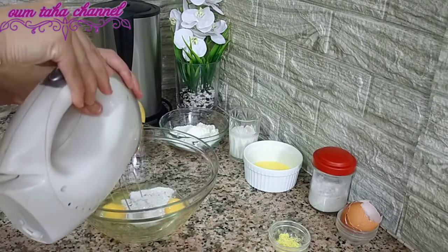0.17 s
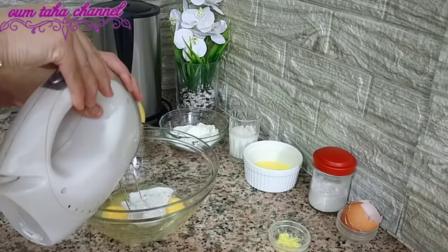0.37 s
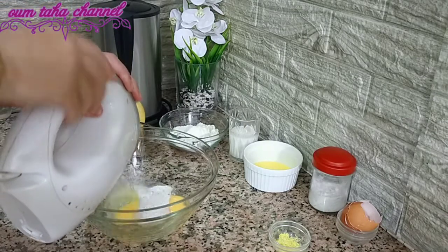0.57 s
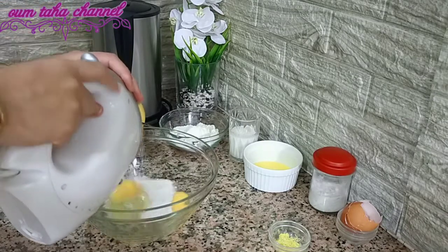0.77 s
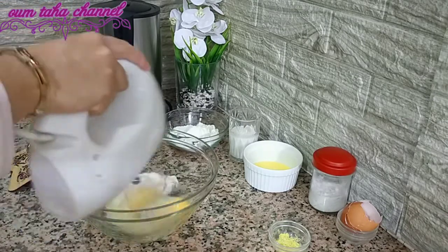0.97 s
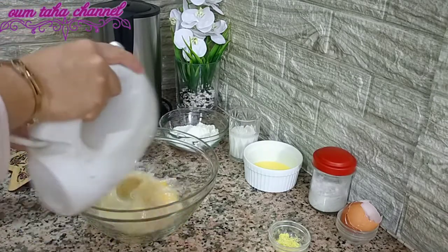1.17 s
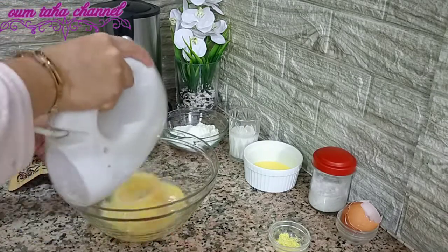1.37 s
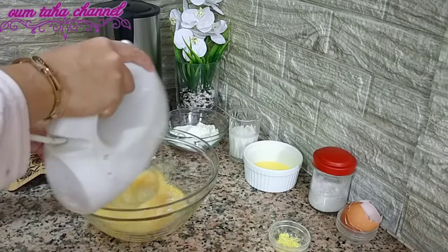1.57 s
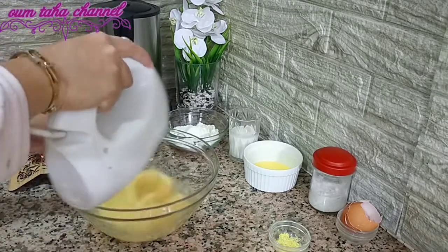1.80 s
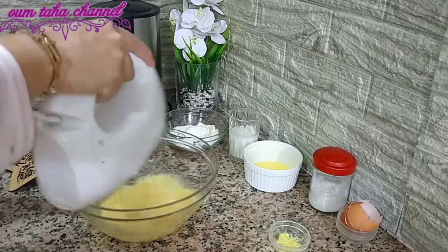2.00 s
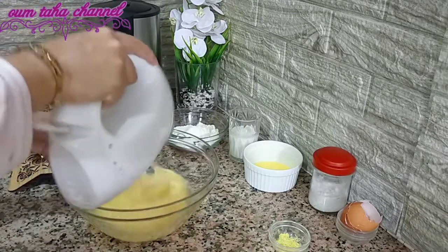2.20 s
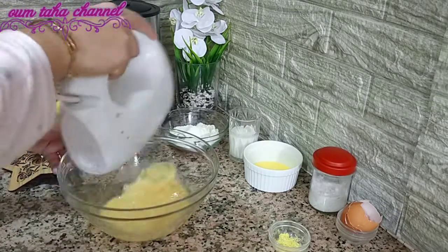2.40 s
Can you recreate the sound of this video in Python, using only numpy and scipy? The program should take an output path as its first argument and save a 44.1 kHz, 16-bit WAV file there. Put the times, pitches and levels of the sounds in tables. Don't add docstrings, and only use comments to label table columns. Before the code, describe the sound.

Hand mixer motor starting with sharp switch snaps, then steady whirring and beaters rattling on a glass bowl

```python
import sys
import numpy as np
from scipy import signal
from scipy.fft import rfft, irfft
from scipy.io import wavfile
from scipy.ndimage import uniform_filter1d

SR = 44100
rng = np.random.default_rng(int(sys.argv[2]) if len(sys.argv) > 2 else 0)


def invert_db(level):
    return 10 ** (np.asarray(level, dtype=float) / 20)


def persist_wave(psi):
    counts = np.round(np.clip(psi, -1, 1) * 32767).astype(np.int16)
    wavfile.write(sys.argv[1], SR, np.atleast_2d(counts).T)


N = 108045
CHANGE_S = 0.8765


def evened(x):
    return x / np.sqrt(np.mean(x ** 2) + 1e-20)


def read(points, hz):
    f, value = np.transpose(points)
    return np.interp(np.log(hz + 1), np.log(f + 1), value)


def follow(points, t):
    return np.interp(t, *np.transpose(points))


def add(mix, start_s, sound):
    part = mix[round(start_s * SR):][:len(sound)]
    part += sound[:len(part)]


def slow(hz):
    size = int(SR / hz)
    return evened(uniform_filter1d(uniform_filter1d(rng.standard_normal(N), size), size))


def resonate(x, hz, width_hz):
    turn = np.exp(2j * np.pi * hz * np.arange(len(x)) / SR)
    r = np.exp(-np.pi * width_hz / SR)
    return 2 * (turn * signal.lfilter([1 - r], [1, -r], x / turn + 1e-18)).real


def shaped(x, field):
    hz, t, z = signal.stft(x, SR, nperseg=512, noverlap=384)
    z = z * invert_db(field(hz[:, None], t[None]))
    return signal.istft(z, SR, nperseg=512, noverlap=384)[1][:len(x)]


# pitch_hz, level_db (per Hz)
ROOM_COLOUR = [(25, -5), (50, -10), (100, -2.5), (140, -11), (420, -23.5), (2900, -27), (4500, -42),
               (16000, -48)]
# pitch_hz, level_db (rms)
HUM = [(49.9, -67.5), (100.3, -60), (156.1, -73), (376.8, -72)]


def room_tone():
    t = np.arange(N) / SR
    hz = np.fft.rfftfreq(N, 1 / SR)
    noise = irfft(rfft(rng.standard_normal(N)) * invert_db(read(ROOM_COLOUR, hz)), N)
    tone = invert_db(-56 - 2.5) * evened(noise)
    for pitch_hz, level_db in HUM:
        level = np.sqrt(2) * invert_db(level_db + 2.0 * slow(1.6))
        tone += level * np.sin(2 * np.pi * (pitch_hz * t + rng.random()))
    return tone * np.where(t < CHANGE_S, 1, invert_db(-16.5))


# start_s, level_db (peak), treble_share (0 to 1), room_db
SNAPS = [
    (.1930, -56, 0.37, 17),
    (0.2001, -12, 0.64, -12.5),
    (.2055, -24, 0.27, -46),
    (.3509, -23, 0.77, -8),
    (.3803, -16, 0.27, -34),
    (.3812, -20, 0.2, -30),
    (.2013, -19, 0.2, -28),
    (.4985, -30, 0.36, -30),
]
# pitch_hz, level_db, fade_s (to -60 dB; anything above 0.022 s is played as
# 0.022 s)
SNAP_LOW = [(1210, -4.5, 0.028), (1830, 2.5, 0.052), (2260, -3.5, 0.013), (3080, -3, 0.025),
            (3357, -2, 0.03), (4160, -35, 0.13)]
# pitch_hz, level_db, fade_s (to -60 dB; anything above 0.022 s is played as
# 0.022 s)
SNAP_HIGH = [(6580, -16, 0.027), (8040, 2, 0.023), (11300, -27, 0.0042), (13130, -6, 0.011),
             (14500, 2, 0.014), (14100, -8, 0.02), (15300, -1, 0.013)]
# pitch_hz, fade_s (to -60 dB)
KITCHEN_FADE = [(300, 0.62), (790, 0.54), (2090, 0.85), (5510, 0.55), (14600, 0.63)]
# pitch_hz, level_db (per Hz)
KITCHEN_COLOUR = [(300, -12.5), (470, -19), (600, 0), (750, 5), (1050, -6), (1900, -4), (4500, -13),
                  (8000, -4), (11000, -16.5), (15000, -6)]


def plastic(rings, t):
    out = np.zeros(len(t))
    for pitch_hz, level_db, fade_s in rings:
        fade = invert_db(level_db - 60 * t / min(fade_s, .022))
        out += fade * np.sin(2 * np.pi * (pitch_hz * t + rng.random()))
    return out / abs(out).max()


def kitchen(hz, s):
    return read(KITCHEN_COLOUR, hz) - 60 * s / np.clip(read(KITCHEN_FADE, hz), .1, .9)


def switch():
    t, out = np.arange(SR // 2) / SR, np.zeros(N)
    for start_s, level_db, treble, room_db in SNAPS:
        low, high = plastic(SNAP_LOW, t), plastic(SNAP_HIGH, t)
        crack = invert_db(3) * np.exp(-t / .003) * np.diff(rng.standard_normal(len(t) + 1))
        snap = (1 - treble) * low + treble * (high + crack / 2)
        echo = shaped(rng.standard_normal(len(t)), kitchen)
        echo *= np.minimum(t / 0.0018, 1) / echo[:2000].std()
        snap *= np.minimum(t / 0.00049, 1)
        add(out, start_s, invert_db(level_db) * (snap + invert_db(room_db - 9.0) * echo))
    return out * (np.arange(N) < CHANGE_S * SR)


# time_s, level_db
WINDUP_LEVEL = [(.38, -35.5), (.42, -37), (.5, -36), (.57, -35.5), (.74, -34.5), (0.868, -33.5)]
# time_s, level_db
RUNNING_LEVEL = [(.88, -53.5), (.91, -50), (1.3, -49), (1.41, -52), (1.47, -56), (1.495, -56),
                 (1.505, -47.5), (1.53, -50), (1.9, -49.5), (2.28, -50), (2.37, -49), (2.376, -57.5),
                 (2.402, -54.5), (2.408, -52.5), (2.44, -49)]
# time_s, speed_hz (turns per second)
WINDUP_SPEED = [(.375, 80), (.395, 88), (.42, 122), (.45, 159), (.49, 191), (.52, 214), (.55, 220),
                (.6, 247), (.66, 268), (.87, 313)]
# time_s, speed_hz (turns per second)
RUNNING_SPEED = [(.88, 341), (.95, 356), (1.04, 368), (1.2, 362), (1.5, 362), (1.7, 360), (2.1, 359),
                 (2.28, 357), (2.44, 364)]
ORDER = [1, 2, 3, 4, 5, 6, 9, 12, 23, 24, 25, 36, 48]
# level_db (full speed), slope_db (per octave of speed), ceiling_db, waver_db
SHAFT = [(16.5, 51, -8.5, 2.5), (-21.5, 4, -17, 6.5), (-12.5, 36, -11, 2.5), (-18.5, 12, -14, 2),
         (-20, 7, -16, 2), (-13, 19, -17, 2.5), (-21, 3, -15, 6), (0, 0, 10, 1), (-19, 37, -19, 7),
         (-9, 38, -12, 6), (-25, 20, -20, 7), (-24, 70, -15, 6), (-44, 20, -25, 6)]
# time_s, level_db
SLOT_WHINE = [(.372, -25), (.388, -3), (.41, -5), (.42, 0), (.46, 0), (.485, -4), (.53, 1), (.553, 0),
              (.563, -12), (.65, -12), (.7, -24), (.87, -40)]
# time_s, level_db
TILT = [(.88, 2), (1.12, -2), (1.2, -2), (1.5, -4), (1.7, 0), (2.0, 2.5), (2.25, 5), (2.36, 0),
        (2.44, -8.5)]
# pitch_hz, level_db (per Hz)
AIR_WINDUP = [(120, -20), (250, -16), (500, -7.5), (1000, -5), (3200, -7.5), (4900, -20), (11000, -23),
              (16000, -14)]
# pitch_hz, level_db (per Hz)
AIR_RUNNING = [(120, -13.5), (300, -11.5), (500, -5.5), (1100, -5.5), (3600, -9), (5200, -20), (11000, -22),
               (16000, -15)]
# pitch_hz, width_hz, level_db
CASING = [(1060, 175, 7), (1389.5, 38, 8), (1810, 96, 3.5), (2127, 244, 5), (849, 160, -15), (560, 66, 4),
          (404, 34, -3), (2700, 560, 2), (8200, 2060, 9.5), (14300, 4100, 3)]


def shaft_tones(t, turns, octave, beat):
    tones, tilt_db = np.zeros(N), follow(TILT, t)
    for k, (level_db, slope_db, ceiling_db, waver_db) in zip(ORDER, SHAFT):
        lift_db = level_db + slope_db * octave
        if k > 30:
            lift_db = lift_db + 30 * (t < CHANGE_S)
        lift_db = np.minimum(lift_db, ceiling_db) + ((k == 1) + (k == 24) / 2) * tilt_db
        throb = 1
        if k == 12:
            lift_db = lift_db + follow(SLOT_WHINE, t)
            throb = (1 + 0.97 * beat) * (1 + .4 * slow(350))
        level = np.sqrt(2) * throb * invert_db(lift_db + waver_db * np.tanh(slow(47)))
        phase = k * turns + rng.random()
        phase += .09 * np.sqrt(k / 24) * slow(200)
        tones += level * np.sin(2 * np.pi * phase)
    return tones


def fan_air(t, turns, octave, beat):
    clicks = invert_db(10 * np.minimum(rng.exponential(1, N), 1.6))
    clicks *= rng.random(N) < 500 / SR
    clicks *= rng.choice([-1, 1], N)
    air = rng.standard_normal(N) * (1 + 0.075 * beat) * (1 + 0.067 * np.cos(2 * np.pi * turns))
    drive = air + invert_db(-9.5) * evened(clicks)

    def through_casing(spectrum):
        def colour(hz, s):
            patches = rng.standard_normal((hz.size, s.size))
            patches = uniform_filter1d(uniform_filter1d(patches, size=6, axis=0), size=16, axis=1)
            casing_db = sum(db / (1 + (2 * (hz - f) / w) ** 2) for f, w, db in CASING)
            treble_db = np.clip(np.log2(hz / 3000 + .01), 0, 1) * 3 * np.interp(s, t, octave)
            return read(spectrum, hz) - 40 * (hz < 110) + casing_db + treble_db + 2 * evened(patches)
        return shaped(drive, colour)

    before = t < CHANGE_S
    early, late = through_casing(AIR_WINDUP), through_casing(AIR_RUNNING)
    return np.where(before, early / early[before].std(), late / late[~before].std())


def motor():
    t = np.arange(N) / SR
    before = t < CHANGE_S
    speed_hz = np.where(before, follow(WINDUP_SPEED, t), follow(RUNNING_SPEED, t))
    level_db = np.where(before, follow(WINDUP_LEVEL, t), follow(RUNNING_LEVEL, t))
    turns = np.cumsum(speed_hz) / SR
    octave = np.log2(speed_hz / 360)
    beat = np.cos(2 * np.pi * 103 * (t - .4195 - 0.00062 * slow(16)))
    start = np.clip((t - 0.361) / 0.01, 0, 1) ** 2
    sound = shaft_tones(t, turns, octave, beat) + fan_air(t, turns, octave, beat)
    return start * invert_db(level_db) * sound


# pitch_hz, width_hz, level_db
GLASS = [(6600, 90, -7), (7030, 60, 0), (8600, 120, -5), (9400, 60, -9), (10050, 60, -3), (10930, 60, -2),
         (11100, 60, -4), (12300, 70, -5), (13100, 70, -10), (14050, 60, -4), (14700, 90, -6),
         (15150, 100, -7), (15600, 100, -11)]
# start_s, level_db, contact_s, low_rings_db
CHATTER = [(.482, -48, .014, -6), (.752, -48, .014, -6), (.8996, -54, .01, -6), (1.337, -49, .014, 4),
           (1.354, -52, .006, -8), (1.380, -45, .018, 0), (1.403, -46, .014, 0), (1.418, -47, .007, 2),
           (1.425, -45, .02, 2), (1.445, -50, .02, 0), (1.4765, -42, .013, 1), (1.490, -50, .009, -6),
           (1.5065, -42, .013, -10), (1.765, -55, .006, -6), (2.309, -42.5, .013, 1), (2.322, -49, .024, 4),
           (2.345, -48, .015, -4), (2.361, -42, .012, 7), (2.376, -48, .018, 2), (2.4015, -43, .013, 3),
           (2.413, -51, .012, 2)]


def bowl():
    out, t = np.zeros(N), np.arange(0, .06, 1 / SR)
    bright = signal.butter(8, 6300, "high", fs=SR, output="sos")
    spreads_db = 2.5 * rng.standard_normal((len(CHATTER), len(GLASS)))
    for (start_s, level_db, contact_s, low_db), spread_db in zip(CHATTER, spreads_db):
        push = np.sin(np.pi * np.clip(t / contact_s, 0, 1) ** 0.45) ** 0.37
        ticks = push * rng.standard_normal(len(t)) * (rng.random(len(t)) < .4)
        ring = np.zeros(len(t))
        for (pitch_hz, width_hz, ring_db), extra_db in zip(GLASS, spread_db):
            level = invert_db(ring_db + extra_db + low_db * (pitch_hz < 8000)) / np.sqrt(width_hz)
            ring += level * resonate(ticks, pitch_hz, width_hz)
        head = round(contact_s * SR)
        burst = ring / ring[:head].std() + invert_db(-18) * ticks / ticks[:head].std()
        damping = np.exp(-np.maximum(t - contact_s, 0) / .004)
        add(out, start_s, invert_db(level_db) * signal.sosfilt(bright, burst) * damping)
    return out


# start_s, level_db, pitch_hz, fade_s (to -60 dB)
PINGS = [(.2, -15, 14700, .02), (.2003, -19, 13700, .02), (.381, -26, 1310, .08), (.752, -33, 9050, .08),
         (.752, -36, 9450, .07), (.752, -38, 6050, .07), (.77, -38, 8300, .06), (.562, -36, 8450, .06),
         (.483, -41, 10900, .2), (1.66, -56, 11100, .08), (2.015, -54, 11100, .07), (2.06, -54, 11100, .08),
         (2.018, -57, 11800, .05), (2.068, -57, 11800, .05), (1.57, -56, 13100, .1)]
# start_s, level_db, pitch_hz, fade_s (to -60 dB)
BUMP = (2.345, -60, 200, .12)


def pings_and_bump():
    out = np.zeros(N)

    def strike(event, length_s, rise_s):
        start_s, level_db, pitch_hz, fade_s = event
        t = np.arange(0, length_s, 1 / SR)
        fade = invert_db(level_db - 60 * t / fade_s) * np.minimum(t / rise_s, 1)
        add(out, start_s, fade * np.sin(2 * np.pi * pitch_hz * t))

    for ping in PINGS:
        strike(ping, .06, .001)
    strike(BUMP, .15, .0049)
    return out


def scene():
    return np.tile(motor() + switch() + bowl() + pings_and_bump() + room_tone(), (2, 1))


def roll_off(x):
    return signal.sosfilt(signal.butter(12, 16830, fs=SR, output="sos"), x)


def record(dry):
    treble = signal.sosfilt(signal.butter(8, 6000, "high", fs=SR, output="sos"), dry[0])
    side = invert_db(-12) * slow(210) * np.maximum(slow(18.5) - 1, 0) * treble
    limit = signal.firwin(255, 15850, window=("kaiser", 7), fs=SR)
    mix = signal.oaconvolve(dry + np.array([side, -side]), limit[None], "same")
    return roll_off(mix)


dry = scene()
out = record(dry)
persist_wave(out)
```